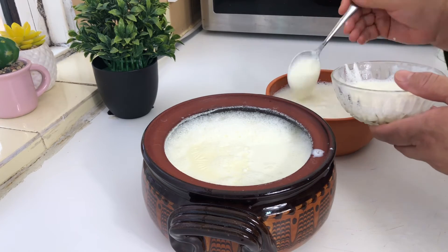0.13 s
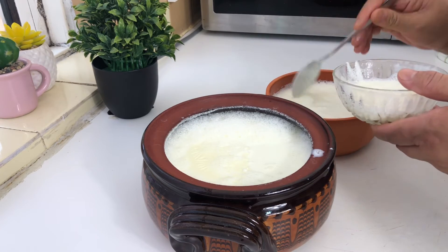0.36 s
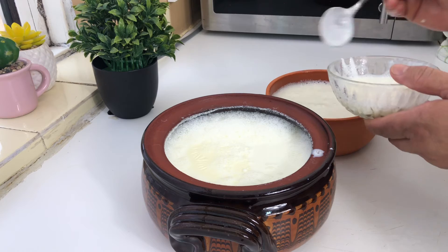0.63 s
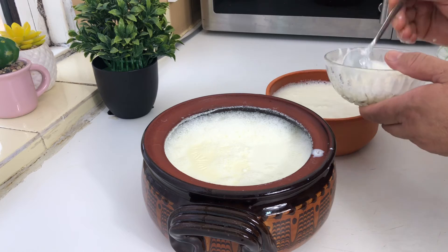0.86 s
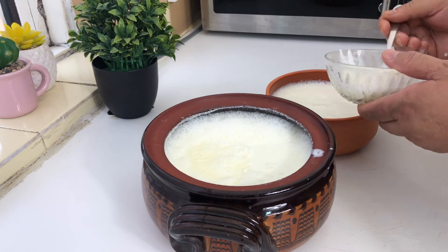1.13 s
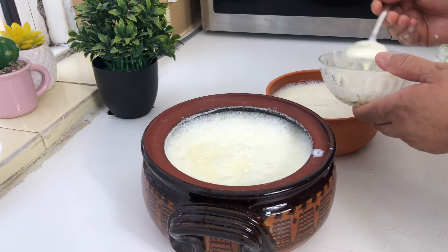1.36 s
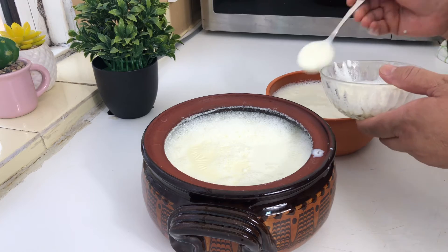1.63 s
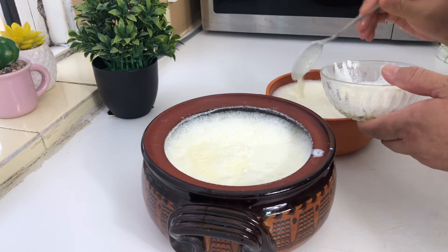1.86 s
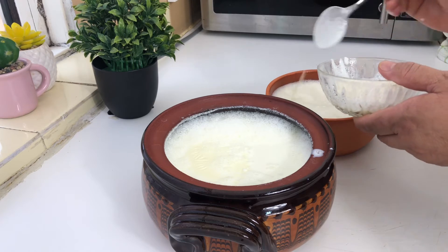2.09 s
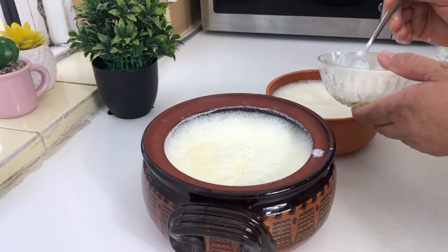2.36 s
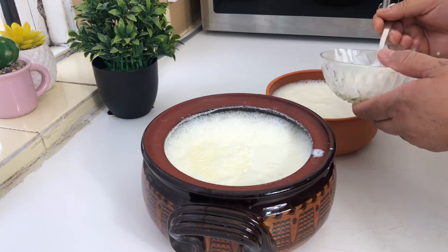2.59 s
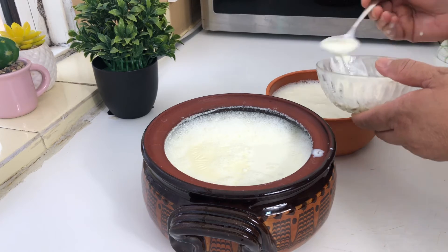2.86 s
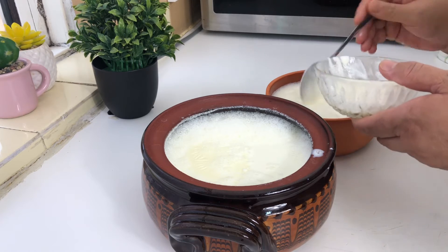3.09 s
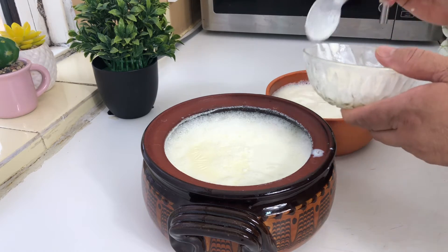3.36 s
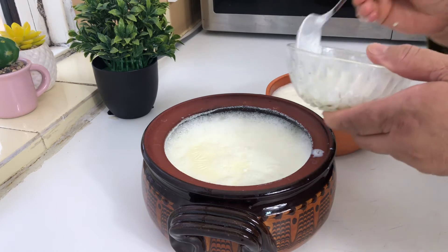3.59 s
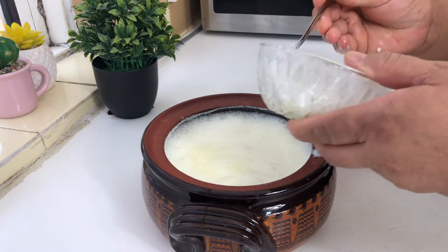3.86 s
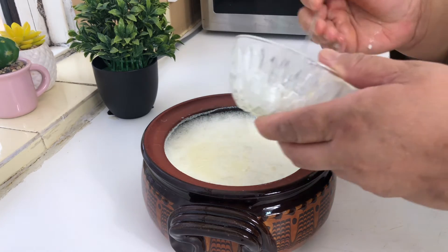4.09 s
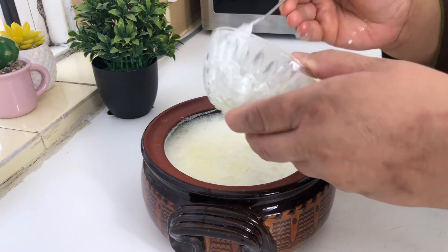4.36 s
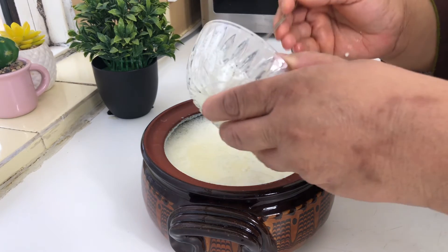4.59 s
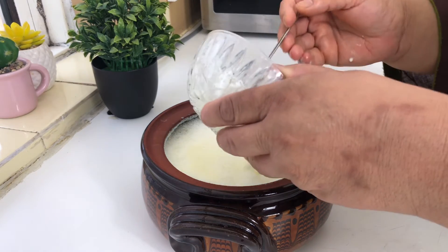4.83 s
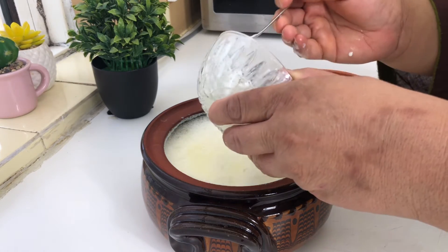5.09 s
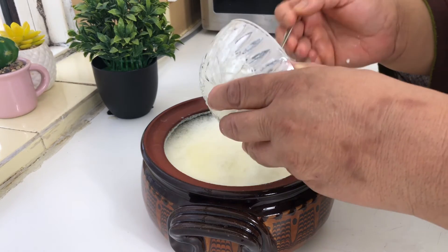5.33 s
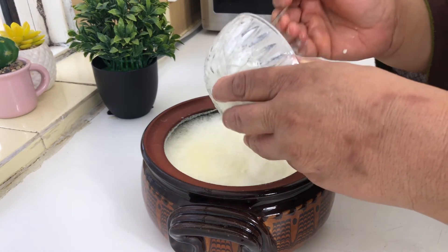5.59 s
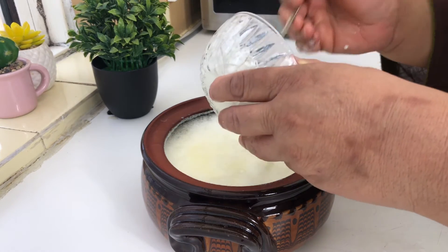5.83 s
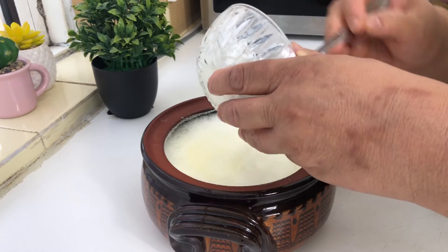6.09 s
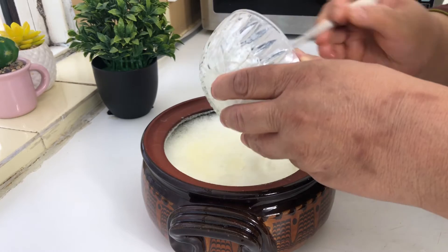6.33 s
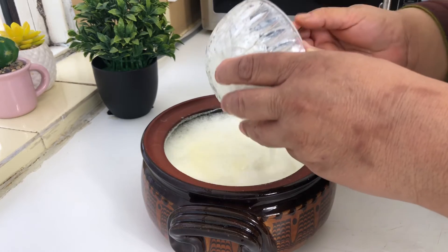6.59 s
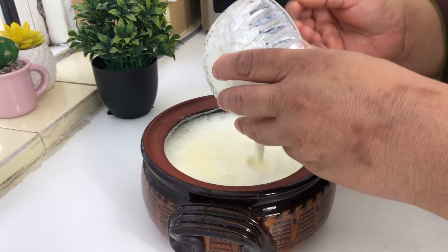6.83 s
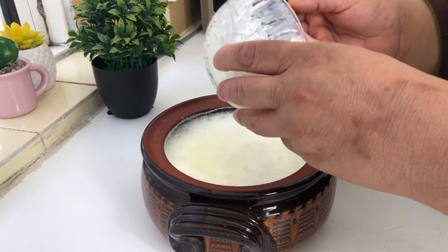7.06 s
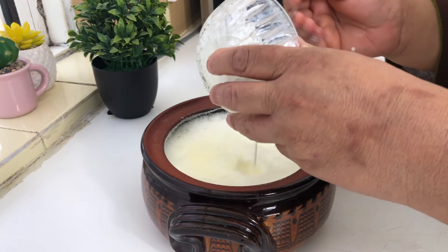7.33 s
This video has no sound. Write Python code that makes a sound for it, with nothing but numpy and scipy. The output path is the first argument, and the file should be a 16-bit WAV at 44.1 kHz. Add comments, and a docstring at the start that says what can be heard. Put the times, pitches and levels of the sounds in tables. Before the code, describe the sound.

In a quiet tiled kitchen, a steel spoon strikes a small hand-held glass bowl close to the microphone. A few faint ticks come first, then a small cluster of clinks, one strong clink, a pause, and finally frequent hard, bright taps with brief gritty scrapes between them. The ring is short, damped by the hands, with a small room tail. A faint low hum and soft hiss lie underneath.

```python
"""Spoon and glass bowl in a kitchen

A steel spoon taps and scrapes a small hand-held glass bowl in a quiet tiled kitchen.
Each tap is a noisy crack plus the decaying modes of rim and spoon; scrapes drive those modes with
uneven grains. Light touches tick or ping through one resonance, and a noise tail answers every contact.
Underneath, a fan hums, a low drone swells and fades, a compressor whines as its valve ticks through
its shell, room tone hisses, and moving air pushes the microphone below hearing.
"""
import sys
import numpy as np
from scipy import signal
from scipy.fft import rfft, irfft, next_fast_len
from scipy.io import wavfile
from scipy.ndimage import uniform_filter1d

SR = 44100
rng = np.random.default_rng(int(sys.argv[2]) if len(sys.argv) > 2 else 0)


def natural_amplitude(level_db):
    """Convert a level in decibels to a linear amplitude factor, elementwise."""
    exponent = np.asarray(level_db, float) / 20
    return 10 ** exponent


def master_out(mix):
    """Clip the mix to full scale and print it as 16-bit PCM to the path in sys.argv[1]."""
    frames = np.transpose(np.atleast_2d(mix))
    ceiling = np.clip(frames, -1, 1)
    pcm = np.round(ceiling * 32767).astype(np.int16)
    wavfile.write(sys.argv[1], SR, pcm)


N = 328557  # length in samples

# Room tone colour, before levelling: f/Hz, relative density/dB per Hz
AIR_COLOUR = [(24, -20.5), (40, 3.5), (96, -7), (159, -8.5), (199, -12.5), (249, -9), (697, -17.5),
              (852, -16.5), (2630, -37), (2910, -35), (3220, -42.5), (8340, -45), (16000, -51.5)]
AIR_DB = -48  # room tone, dB rms
# Moving air on the microphone: t/s, level/dB rms
DRAUGHT = [(0.0, -12.5), (0.6, -20.5), (2.97, -35), (3.36, -27), (7.45, -35.5)]

# Fan hum: shaft order, level/dB rms
FAN_ORDERS = [(4, -49.5), (5, -63.5), (6, -62), (7, -56.5), (10, -63.5), (13, -67)]
FAN_HZ = 37.9  # shaft turns a second
# Low drone, swelling and fading: t/s, level/dB rms
DRONE_LEVEL = [(3.3, -61), (3.9, -48.5), (4.9, -54.5), (5.2, -47.5), (5.5, -52.5), (6.1, -55.5), (6.4, -47),
               (7.0, -53.5), (7.3, -47.5), (7.45, -39)]
# Compressor shell resonances: f/Hz, width of each of two passes/Hz, level/dB rms
SHELL = [(2935, 41, -75), (6620, 60, -90), (8180, 200, -87), (8950, 390, -85)]
STROKE_HZ = 48.75  # compressor strokes a second

# How fast the kitchen's tail dies: f/Hz, t60/s
KITCHEN_T60 = [(500, 0.49), (2500, 0.37), (9000, 0.37), (15000, 0.2)]

# Light contacts: t/s, direct peak level/dB, centre f/Hz, width of each of two passes/Hz
TOUCHES = [(0.039, -40.5, 4760, 6000), (0.261, -38, 2600, 2980), (.371, -38.5, 1980, 1240),
           (1.36, -41.5, 1930, 250), (1.867, -41, 2100, 1460), (1.884, -41, 6860, 4000),
           (2.149, -46, 2760, 900), (2.295, -27.5, 3420, 3500), (3.096, -53.5, 5000, 5000),
           (3.755, -26.5, 8100, 8900), (3.848, -34.5, 3380, 6000), (3.864, -28, 2140, 2430),
           (3.951, -41.5, 6000, 12000), (4.470, -41, 7400, 2470), (4.474, -37, 1500, 250),
           (4.556, -34, 1990, 1500), (4.742, -42.5, 1810, 1800), (4.801, -53, 6300, 600),
           (4.87, -29, 1010, 470), (4.895, -49, 5940, 900),  (5.242, -41.5, 1540, 200),
           (5.787, -44.5, 9250, 9120), (5.869, -54.5, 4300, 706), (5.946, -20.5, 10500, 14100),
           (6.241, -39.5, 3310, 489), (6.825, -53, 3570, 900), (7.055, -32, 2850, 700),
           (7.155, -32.5, 3630, 394), (7.342, -40.5, 7700, 9200), (7.400, -38, 3800, 1430),
           (7.408, -35, 9300, 7700)]

# Blows: t/s, direct crack peak level/dB, hardness/dB per octave, extra body below BODY_HZ/dB,
# rim gain over crack/dB, struck spot round the rim from the grip/degrees, spoon gain over crack/dB
TAPS = [(0.8583, -11, 0.5, 3, -20, 19.8, -22.5), (0.9871, -27, -5, -9, -14.5, 38, -18),
        (1.061, -12.5, -3, -29, -10.5, 62, -56), (2.3341, -5, -1, -9.5, -32, 87, -41.5),
        (3.5956, -7.5, 3, -6.5, -7.5, 35.4, -35), (4.0553, -14, -10, -11, -30.5, 50, -21.5),
        (4.3172, -2.5, 9.5, -1.5, -11.5, 86, -42.5), (4.3945, -15, 4, 9.5, -12, 105, -12.5),
        (4.611, -24, -10.5, -22, -34, 52, -23), (4.867, -32, 2, -2, -26, 45, -32),
        (5.0543, -9, 7, 9.5, -13.5, 63, -21.5), (5.2784, -12.5, 5, 6.5, -42.5, 81, -15.5),
        (5.52, -3, 8.5, 9.5, -31.5, 40, -21.5), (6.012, -1, 5.5, 3, -20.5, 57, -18.5),
        (6.4285, -2, 3.5, -11.5, -10, 4.1, -25), (6.5072, -7, 8, 11, -32.5, 87, -20.5),
        (6.8887, -1.5, 8.5, 9, -7, 73, -28), (7.424, -1.5, -1, -7, -4.5, 62.6, -19.5)]
# Crack colour, before tilt and levelling: f/Hz, relative density/dB per Hz
CRACK_COLOUR = [(200, -32.5), (700, 10.5), (1300, 25), (2000, 19.5), (3200, 20), (4500, 12), (6800, 1),
                (8600, 12), (10500, -4), (16000, -5.5)]
PRESS_S, CHATTER_T60_S = .0015, .022  # a contact holds its strength, then chatters away (s)
BODY_HZ = 1700  # the extra body lies below this (Hz)

# Glass rim bending modes, some in close pairs: f/Hz before the grip's pitch ratio
RIM_HZ = [1485, 3385, 3450, 5860, 5915, 7370, 8870, 8925, 12480]
# The same modes: relative level/dB, t60 before shortening/s
RIM_MODES = [(-5.5, 0.15), (-7, 0.098), (-10.5, 0.23), (-5, 0.057), (-1.5, 0.12), (-18, 0.23), (-18, 0.13),
             (-13, 0.22), (-14, 0.099)]
# The same modes: bends round the rim
RIM_ORDER = [2, 3, 3, 4, 4, 2, 5, 5, 6]
# The tilting grip loads the rim: t/s, pitch ratio
RIM_PITCH = [(0, 1.021), (3.7, 1.014), (4.3, 1), (7.45, 1.003)]
# How freely the rim rings: t/s, share of each t60
RIM_FREE = [(2.6, 0.94), (4.3, 0.93)]
NODE_LEAK = 0.048  # amplitude share a mode still gets when struck on its node

# Spoon modes: f/Hz before the grip's small shift
SPOON_HZ = [1230, 1600, 1940, 2650, 2810, 3620, 4280, 4580, 5450, 6300, 7270, 7500, 8220, 8640, 11500,
            11820, 12890, 13620, 15420]
# The same modes: relative level/dB
SPOON_DB = [-12.5, -4.5, -6, -2.5, -6, 5, 3, -5, -7.5, -5.5, -12, 0.5, -4, 2, -5, -4.5, -8.5, -8, -12.5]
# The fingers damp the spoon (t60 in s at 4500 Hz); high modes die sooner by this power of pitch
SPOON_T60_S, SPOON_FADES = .03, .6
FLUTTER_HZ, FLUTTER = 90, .27  # waver of held modes: steps a second, depth in radians per kHz

# Sliding strokes: t/s, length/s, direct level/dB, rim share 0-1, chatter f/Hz
STROKES = [(0.98, 0.12, -47.5, 1, 2880), (2.337, 0.16, -50, 0.1, 1755), (2.515, 0.032, -45, 0.4, 2690),
           (3.868, 0.14, -48, 0, 2680), (3.922, 0.061, -51.5, 0, 3800), (3.985, 0.065, -45.5, 0.2, 2380),
           (4.412, 0.15, -52.5, 0, 3670), (4.566, 0.048, -46.5, 0, 2720), (5.631, 0.07, -48, 0.27, 2920),
           (6.209, 0.049, -51, 0.4, 1496), (6.632, 0.06, -50, 0.34, 2610),
           (7.014, 0.056, -43.5, 0.36, 1335), (7.135, 0.026, -46.5, 0.4, 1935)]
# Tilt of a stroke chattering at 2500 Hz (dB per octave), and its rise per octave of chatter
SLIDE_HARDNESS_DB, SLIDE_BRIGHTENS_DB = -9, 4.5
SLIDE_SPOT, SLIDE_DAMPS = 64, .35  # degrees round the rim from the grip; share of rim t60 left
CLUMP_S, CLUMP_DB = .004, 5  # the slips come in bunches this long and this uneven

TOP_HZ = 15500  # the top of the flat response (Hz)


def unit(x):
    """Level a sound to rms 1."""
    return x / np.sqrt(np.mean(x ** 2, axis=-1, keepdims=True) + 1e-20)


def along(points, hz):
    """Read (Hz, value) points on a log axis."""
    f, v = np.transpose(points)
    return np.interp(np.log(hz + 1), np.log(f + 1), v)


def curve(rows):
    """Draw one value per sample from (s, value) rows."""
    return np.interp(np.arange(N) / SR, *np.transpose(rows))


def filtered(x, response):
    """Shape x by a response of frequency, which may be complex."""
    m = 2 * next_fast_len(x.shape[-1] // 2 + 4096)
    spectrum = rfft(x, m) * response(np.fft.rfftfreq(m, 1 / SR))
    return irfft(spectrum, m)[..., :x.shape[-1]]


def peak(hz, centre_hz, width_hz):
    """One causal resonance."""
    return 1j * hz * width_hz / (centre_hz ** 2 - hz ** 2 + 1j * hz * width_hz)


def causal(gain):
    """Minimum-phase response with this gain, so that nothing sounds before its cause."""
    c = irfft(np.log(gain + 1e-6))
    # fold the cepstrum onto positive time
    c[1:len(c) // 2] *= 2
    c[len(c) // 2 + 1:] = 0
    return np.exp(rfft(c))


def add(track, sound, s):
    """Mix a sound into the track at s seconds."""
    part = track[round(s * SR):][:len(sound)]
    part += sound[:len(part)]


def air():
    """Room tone is steady coloured noise; moving air adds slow pressure swings on the microphone."""
    tone = unit(filtered(rng.standard_normal(N), lambda hz: natural_amplitude(along(AIR_COLOUR, hz))))
    swing_response = lambda hz: peak(hz, 3.9, 6.5) / (1 + (hz / 15) ** 6)
    swings = unit(filtered(rng.standard_normal(N), swing_response))
    return natural_amplitude(AIR_DB) * tone + natural_amplitude(curve(DRAUGHT)) * swings


def narrow(centre_hz, width_hz, steady):
    """A wavering tone of rms 1: a sine, stronger with steady, in a thin band of noise."""
    sine = np.sin(2 * np.pi * (centre_hz * np.arange(N) / SR + rng.random()))
    band = unit(filtered(rng.standard_normal(N), lambda hz: peak(hz, centre_hz, width_hz) ** 2))
    return unit(steady * sine + band)


def fan():
    """The turning shaft hums at multiples of its speed."""
    return sum(natural_amplitude(db) * narrow(order * FAN_HZ, width_hz=3, steady=5) for order, db in FAN_ORDERS)


def drone():
    """A low wavering tone at 105 Hz swells and fades."""
    return natural_amplitude(curve(DRONE_LEVEL)) * narrow(105, width_hz=4, steady=2.5)


def compressor():
    """The valve ticks once a stroke, over faint noise, and the shell's resonances turn it to a whine."""
    ticks = np.diff(np.floor(np.arange(N + 1) * STROKE_HZ / SR))
    driven = ticks + 0.0093 * rng.standard_normal(N)
    return sum(natural_amplitude(db) * unit(filtered(driven, lambda f: peak(f, hz, width) ** 2))
               for hz, width, db in SHELL)


def burst():
    """A contact's force: a sharp front, a short press and a few milliseconds of chatter."""
    t = np.arange(SR // 4) / SR
    chatter = rng.standard_normal(len(t)) * natural_amplitude(-60 * np.maximum(t - PRESS_S, 0) / CHATTER_T60_S)
    return chatter + (t == 0) * 4


def echoed(sound, wet_db):
    """The direct sound and a fresh room tail in which each frequency dies at its own speed."""
    hz, t, z = signal.stft(rng.standard_normal(SR // 2), SR, nperseg=256)
    decay = natural_amplitude(-60 * t / along(KITCHEN_T60, hz)[:, None])
    tail = signal.istft(z * decay, SR, nperseg=256)[1]
    tail = natural_amplitude(wet_db) * tail / np.linalg.norm(tail)
    gap = np.zeros(round(.002 * SR))  # 2 ms before the walls answer
    return signal.fftconvolve(sound, np.r_[1, gap, tail])


def touches():
    """Light contacts wake one resonance only: wide for a tick, narrow for a ping."""
    out = np.zeros(N)
    for s, db, centre_hz, width_hz in TOUCHES:
        sound = filtered(burst(), lambda hz: peak(hz, centre_hz, width_hz) ** 2)
        add(out, natural_amplitude(db) * echoed(sound / np.abs(sound).max(), wet_db=-4.5), s)
    return out


def crack(hardness, body_db=0):
    """The contact itself, peak 1; a harder one is brighter, a soft one only loses its top."""
    low_hz = 1500 if hardness > 0 else 2800  # the tilt flattens below this

    def gain(hz):
        tilt = hardness * np.log2(np.clip(hz, low_hz, 10000) / 4500)
        body = body_db / (1 + (hz / BODY_HZ) ** 6)
        return natural_amplitude(along(CRACK_COLOUR, hz) + tilt + body)

    sound = filtered(burst(), lambda hz: causal(gain(hz)))
    return sound / np.abs(sound).max()


def ring(modes_hz, modes_db, t60):
    """A held object's decaying modes, at new strengths each time, each wavering as the grip shifts."""
    hz, db, t60 = np.broadcast_arrays(modes_hz, modes_db, t60)
    t = np.arange(SR // 4)[:, None] / SR
    db = db + 2.2 * rng.standard_normal(len(hz))
    knots = rng.standard_normal((len(hz), FLUTTER_HZ // 4 + 2))
    # every mode's phase wanders away from zero
    waver = np.transpose([np.interp(t[:, 0] * FLUTTER_HZ, np.arange(len(k)), k - k[0]) for k in knots])
    phase = 2 * np.pi * hz * t + FLUTTER * hz / 1000 * waver
    return np.sum(natural_amplitude(db - 60 * t / t60) * np.sin(phase), axis=1)


def rim(s, db, spot, free=1):
    """The glass rim; each shape of bending is woken by how far from its nodes the spot lies."""
    hz = np.interp(s, *np.transpose(RIM_PITCH)) * np.array(RIM_HZ)
    modes_db, t60 = np.transpose(RIM_MODES)
    woken = np.cos(np.radians(spot) * np.array(RIM_ORDER)) ** 2 + NODE_LEAK ** 2  # power
    t60 = t60 * free * np.interp(s, *np.transpose(RIM_FREE))
    return ring(hz, db + modes_db + 10 * np.log10(woken), t60)


def spoon(db, hardness):
    """The spoon's modes, shifted a little by each grip; a harder contact favours the high ones."""
    hz = SPOON_HZ * (1 + .008 * rng.standard_normal(len(SPOON_HZ)))
    modes_db = db + np.array(SPOON_DB) + hardness * np.log2(hz / 4500)
    return ring(hz, modes_db, SPOON_T60_S * (4500 / hz) ** SPOON_FADES)


def taps():
    """Every blow cracks and rings rim and spoon at its own strengths; the next blow stops the rim."""
    out = np.zeros(N)
    waits = np.diff([s for s, *_ in TAPS], append=N / SR + 1)
    for (s, db, hardness, body_db, rim_db, spot, spoon_db), wait in zip(TAPS, waits):
        glass = rim(s, rim_db, spot)
        overrun = np.maximum(np.arange(len(glass)) / SR - wait, 0)
        glass = glass * natural_amplitude(-900 * overrun)  # damped at 900 dB a second
        blow = crack(hardness, body_db) + glass + spoon(spoon_db, hardness)
        add(out, natural_amplitude(db) * echoed(blow, wet_db=-6.5), s)
    return out


def slips(length_s):
    """The edge sticks and slips in uneven, bunched grains of noise under a smooth envelope."""
    noise, uneven, bunches = rng.standard_normal((3, SR // 4))[:, :round(length_s * SR)]
    bunches = unit(uniform_filter1d(bunches, round(CLUMP_S * SR)))
    return unit(noise * natural_amplitude(5 * uneven + CLUMP_DB * bunches) * np.hanning(len(noise)) ** .3)


def strokes():
    """Stick-slip grains drive rim and spoon, and the sliding edge chatters at one pitch per stroke."""
    out = np.zeros(N)
    for start, length, db, share, chatter_hz in STROKES:
        hardness = SLIDE_HARDNESS_DB + SLIDE_BRIGHTENS_DB * np.log2(chatter_hz / 2500)
        glass = unit(rim(start, 0, SLIDE_SPOT, SLIDE_DAMPS))
        body = share * glass + (1 - share) * unit(spoon(0, hardness))
        body = body + .9 * unit(crack(hardness, body_db=-9))
        body = body + 1.15 * unit(ring([chatter_hz], 0, t60=0.035))
        scrape = signal.fftconvolve(slips(length), body / np.linalg.norm(body))
        add(out, natural_amplitude(db) * echoed(scrape, wet_db=-2.5), start)
    return out


def scene():
    """Spoon and bowl over the kitchen's own sounds, in mono."""
    kitchen = air() + fan() + drone() + compressor()
    return (kitchen + touches() + taps() + strokes())[None]


def band_limit(x):
    """A steep low-pass at the top of the band."""
    return signal.sosfilt(signal.butter(12, 16980, fs=SR, output="sos"), x)


def record(dry):
    """Peaks clip at 0.9 of full scale, then the top falls away by 0.03 dB per Hz above TOP_HZ."""
    clipped = np.clip(dry, -.9, .9)
    dull = filtered(clipped, lambda hz: natural_amplitude(-.03 * np.maximum(hz - TOP_HZ, 0)))
    return band_limit(dull)


dry = scene()
out = record(dry)
master_out(out)
```